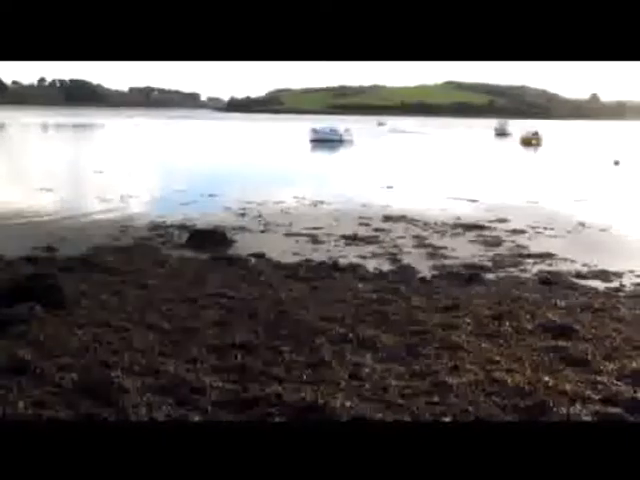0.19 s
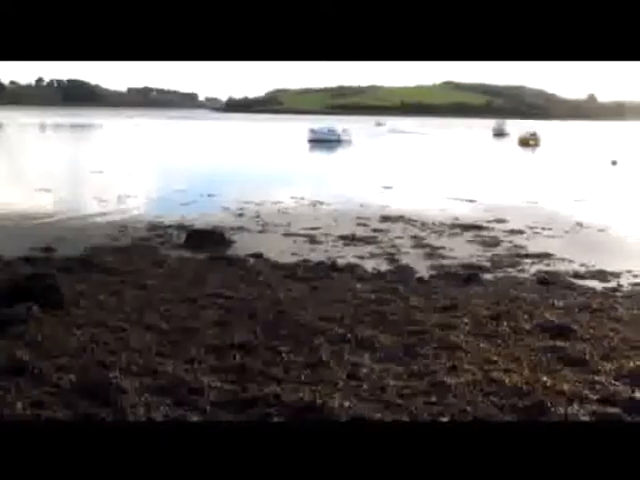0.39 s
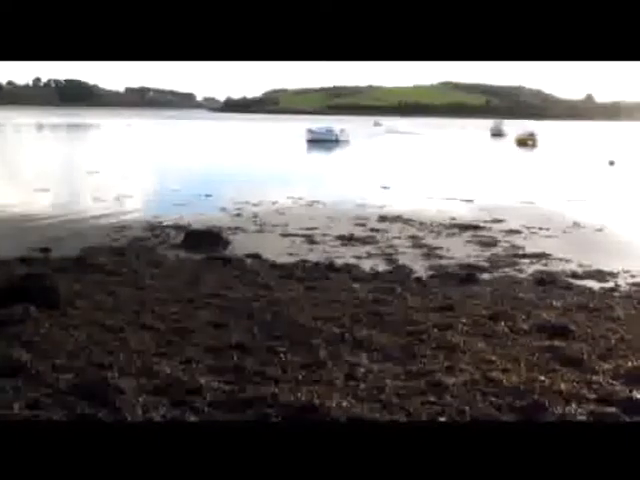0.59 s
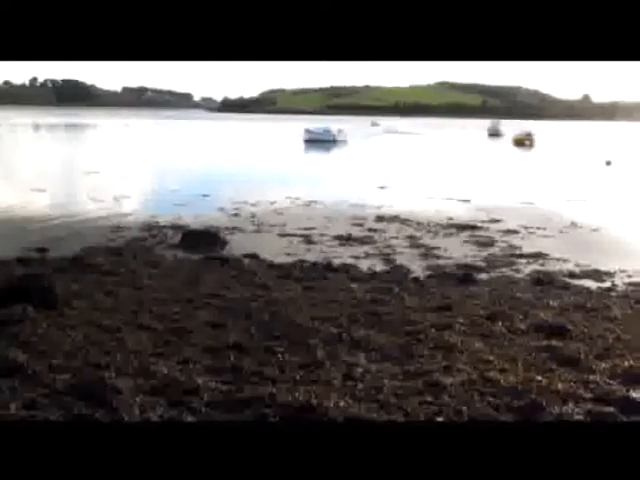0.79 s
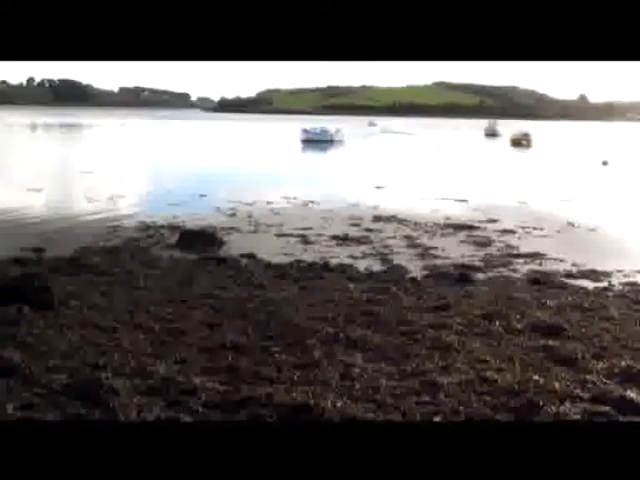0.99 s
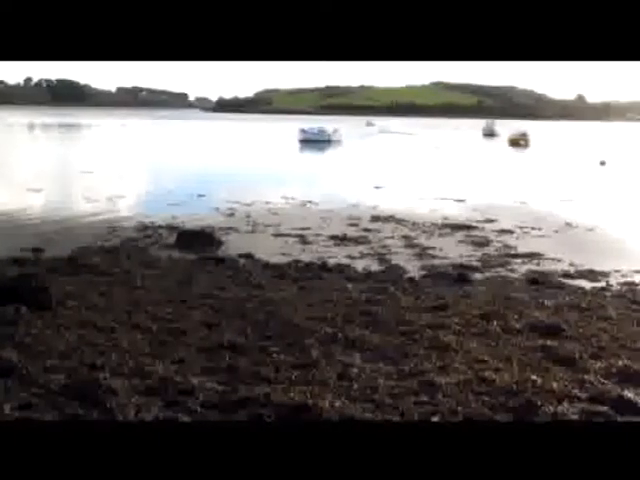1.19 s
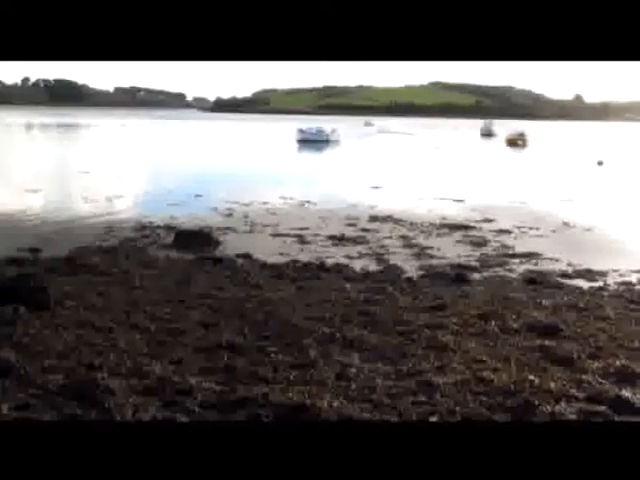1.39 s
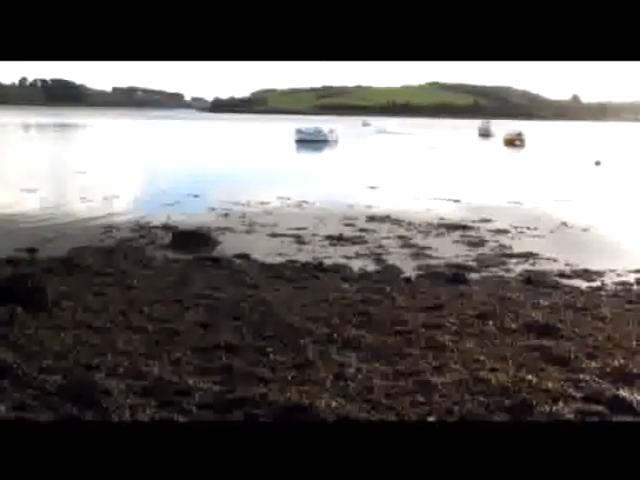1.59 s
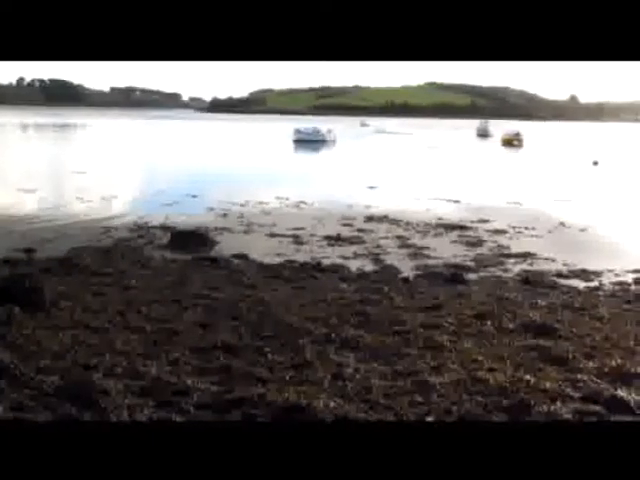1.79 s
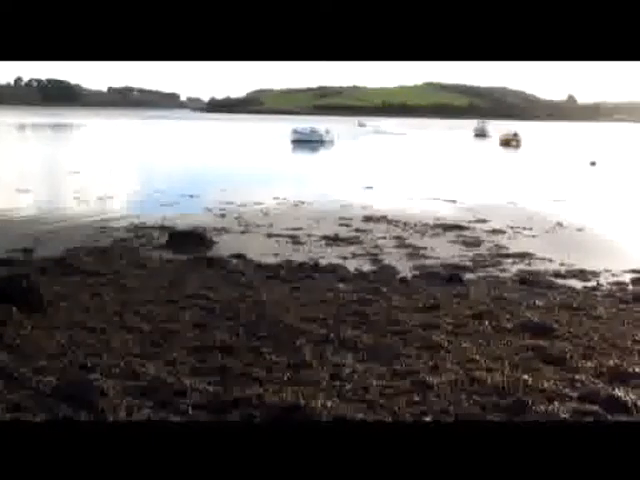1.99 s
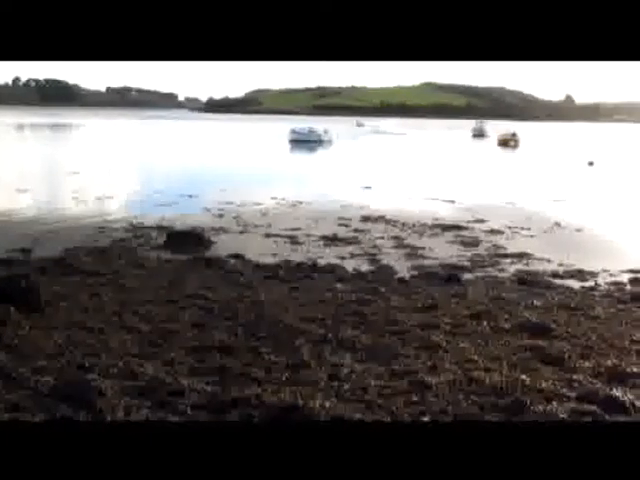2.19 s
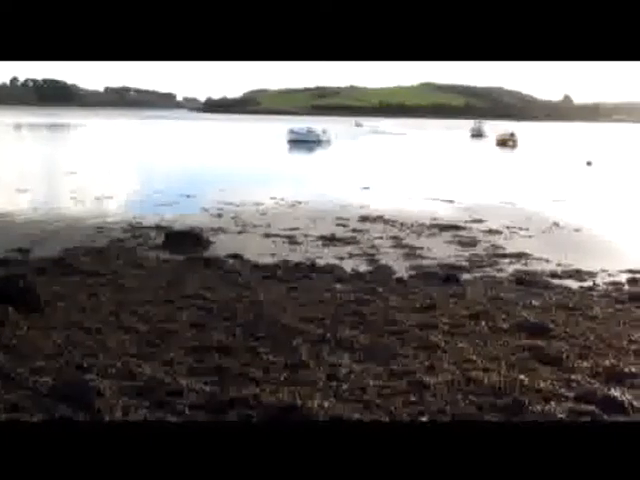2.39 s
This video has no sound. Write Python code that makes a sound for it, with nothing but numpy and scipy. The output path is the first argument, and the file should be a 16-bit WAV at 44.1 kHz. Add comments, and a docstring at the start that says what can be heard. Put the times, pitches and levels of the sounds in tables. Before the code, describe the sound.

A wading bird on an open estuary calls three times, hoarse rasps breaking into bubbling clear whistles, the third fainter; a long soft echo and faint hiss lie behind, heard through a dull, limited microphone.

```python
"""The echo of an earlier call is still fading when a wading bird on an estuary gives three bubbling calls,
near 0.2, 1.1 and 2 s, the last one fainter. Hoarse rasps (bursts of noise ringing a throat) break into clear
whistles (near sines) whose pitch swings up and down. The flats return a long soft echo (scattered noise
tails) over faint hiss and rumble; echo and hiss swell through the second call, then sink.
The recorder samples slowly, so the sound is dull and leaves a faint mirror image in the treble."""
import sys
import numpy as np
from scipy import signal
from scipy.fft import rfft, irfft, next_fast_len
from scipy.io import wavfile
from scipy.ndimage import uniform_filter1d

SR = 44100
rng = np.random.default_rng(int(sys.argv[2]) if len(sys.argv) > 2 else 0)


def file_out(sig):
    """Save sig as 16-bit WAV at sys.argv[1]."""
    # one column per channel
    cols = np.atleast_2d(sig).T
    # limit, then scale
    lim = np.clip(cols, -1, 1)
    pcm = np.round(lim * 32767).astype(np.int16)
    wavfile.write(sys.argv[1], SR, pcm)


N = 112455  # length in samples


def amp(db):
    """Turns decibels into a plain multiplier."""
    return 10 ** (np.asarray(db) / 20)


def evened(x):
    """Scales a sound to an rms of 1."""
    return x / np.sqrt(np.mean(x ** 2) + 1e-20)


def noise(size):
    """White noise, equally strong at every pitch."""
    return rng.standard_normal(size)


def drift(hz, size):
    """Slow random wander of rms about 1, mostly below hz."""
    count = next_fast_len(size + SR // 5)
    f = np.fft.rfftfreq(count, 1 / SR)
    spectrum = rfft(noise(count)) / (1 + (f / hz) ** 4)
    return evened(irfft(spectrum, count))[:size]


def shaped(x, points):
    """Colours a sound by a (Hz, dB) spectrum, silent outside it."""
    f, db = np.transpose(points)
    hz = np.fft.rfftfreq(len(x), 1 / SR)
    gain_db = np.interp(np.log(hz + 1), np.log(f + 1), db, -150, -150)
    return irfft(rfft(x) * amp(gain_db), len(x))


def lowpass(x, hz):
    """Removes everything above hz with a steep filter."""
    return signal.oaconvolve(x, signal.firwin(511, hz, window=("kaiser", 9), fs=SR), "same")


def resonate(x, hz, width):
    """Rings a sound at a pitch that may move: shift that pitch to zero, smooth twice, shift back."""
    turn = np.exp(2j * np.pi * np.cumsum(hz * np.ones(len(x))) / SR)
    r = np.exp(-np.pi * width / SR)
    smooth = signal.lfilter([(1 - r) ** 2], [1, -2 * r, r * r], x / turn)
    return 2 * (turn * smooth).real


def noise_band(hz, width):
    """Noise gathered around a moving pitch by ringing it twice, rms 1."""
    once = resonate(noise(len(hz)), hz, width)
    return evened(resonate(once, hz, width))


def span(rows):
    """Sample range, times and columns of one table."""
    s, *cols = np.transpose(rows)
    at = np.arange(round(s[0] * SR), min(round(s[-1] * SR), N))
    t = at / SR
    return at, t, [np.interp(t, s, c) for c in cols]


def played(parts):
    """Adds all the parts together, each at its own time."""
    mix = np.zeros(N)
    for at, sound in parts:
        mix[at] += sound
    return mix


def whistle(rows):
    """A near sine with a flickering octave, and bands of noise at one, two and three times its pitch."""
    # strength of the octave relative to the whistle, before its start boost and flicker: pitch_hz, level_db
    octave_levels = [(2600, -50), (3000, -32.5), (3400, -19.5), (3900, -25), (4200, -28.5)]
    # strength of the noise at three times the pitch, relative to the whistle: pitch_hz, level_db
    third_levels = [(4100, -55.5), (4400, -36.5), (4700, -29.5), (4900, -55)]
    octave_start_db, octave_start_s = 6.5, 0.072  # the octave is brightest as the whistle catches
    attack_s, release_s = 0.0021, 0.0023
    at, t, (hz, db) = span(rows)
    for _ in range(2):
        hz = uniform_filter1d(hz, size=330, mode="nearest")
    db = uniform_filter1d(db, size=260, mode="nearest")
    phase = 2 * np.pi * np.cumsum(hz) / SR

    octave_db = np.interp(2 * hz, *np.transpose(octave_levels))
    octave_db = octave_db + octave_start_db * np.exp(-(t - t[0]) / octave_start_s)
    flicker_db = 3 * drift(65, size=len(t))
    tone = np.sin(phase) + amp(octave_db + flicker_db) * np.sin(2 * phase)

    halo = amp(-41) * noise_band(hz, width=402)
    halo = halo + 0.4 * amp(octave_db) * noise_band(2 * hz, width=340)
    third_db = np.interp(3 * hz, *np.transpose(third_levels))
    halo = halo + amp(third_db) * noise_band(3 * hz, width=260)

    edge = np.clip(np.minimum((t - t[0]) / attack_s, (rows[-1][0] - t) / release_s), 0, 1)
    return at, edge * amp(db) * (np.sqrt(2) * tone + halo)


def clear_whistles():
    """All the steady whistles of the three calls, with faint low undertones."""
    # pitch paths, one list per whistle: time_s, pitch_hz, level_db
    swoops = [
        [(0.231, 1943, -17), (0.247, 1925, -18), (0.263, 1752, -24), (0.277, 1439, -21), (0.285, 1341, -25),
         (0.297, 1270, -41.5)],
        [(0.396, 1932, -20), (0.408, 2074, -12.5), (0.422, 2010, -14.5), (0.442, 1518, -33.5),
         (0.46, 1385, -26), (0.478, 1360, -47)],
        [(1.337, 1841, -29), (1.342, 1976, -15.5), (1.355, 2089, -14.5), (1.371, 2014, -15.5),
         (1.383, 1692, -22), (1.39, 1750, -40)],
        [(1.401, 1617, -31), (1.409, 1459, -25.5), (1.429, 1494, -25), (1.443, 1555, -24), (1.451, 1627, -31.5),
         (1.456, 1665, -43)],
        [(1.472, 1877, -16.5), (1.48, 2018, -18.5), (1.494, 2051, -16.5), (1.504, 2009, -16),
         (1.518, 1704, -24.5), (1.522, 1676, -34)],
        [(2.254, 1839, -33), (2.268, 2077, -29), (2.28, 2066, -30), (2.288, 2008, -29.5), (2.3, 1663, -38.5),
         (2.306, 1750, -45)],
    ]
    warbles = [
        [(0.538, 1928, -20), (0.546, 2041, -15), (0.564, 2015, -17.5), (0.586, 1501, -26), (0.61, 1506, -24.5),
         (0.634, 1645, -26), (0.658, 1938, -17.5), (0.676, 1995, -19), (0.7, 1556, -27.5), (0.732, 1580, -26),
         (0.774, 1947, -21), (0.79, 1950, -23), (0.818, 1701, -23), (0.838, 1645, -32), (0.853, 1555, -39)],
        [(1.566, 1793, -28.5), (1.574, 1720, -23), (1.59, 1955, -18), (1.604, 1988, -18), (1.614, 1861, -23.5),
         (1.63, 1681, -24.5), (1.638, 1605, -26), (1.668, 1639, -26), (1.696, 1669, -26), (1.722, 1710, -25),
         (1.732, 1617, -33), (1.738, 1587, -66)],
        [(2.319, 1563, -50), (2.329, 1457, -38), (2.345, 1468, -36.5), (2.363, 1565, -37), (2.375, 1615, -39.5),
         (2.405, 2006, -32), (2.423, 2053, -32.5), (2.431, 2005, -34), (2.449, 1593, -40.5),
         (2.461, 1524, -38.5), (2.483, 1540, -43), (2.517, 1962, -39), (2.533, 1974, -40), (2.56, 1805, -39.5)],
    ]
    chips = [
        [(1.16, 2048, -21), (1.168, 1978, -15), (1.184, 1764, -25), (1.192, 1775, -24.5)],
        [(1.188, 2057, -37.5), (1.196, 2198, -21.5), (1.21, 1866, -37.5)],
        [(1.389, 2020, -22.5), (1.397, 1928, -26.5), (1.415, 2016, -50.5)],
        [(1.523, 2007, -26.5), (1.539, 1996, -31.5), (1.563, 2052, -26.5), (1.572, 1740, -27)],
        [(2.042, 1884, -25), (2.052, 1997, -25.5), (2.068, 1745, -28), (2.076, 1954, -48)],
        [(2.073, 2107, -28.5), (2.083, 2080, -35.5), (2.092, 1987, -48)],
        [(2.304, 2147, -46), (2.31, 2090, -42.5), (2.32, 1930, -43.5)],
    ]
    low_chips = [
        [(1.208, 1407, -33), (1.222, 1359, -25), (1.242, 1410, -35)],
        [(1.516, 1680, -30.5), (1.524, 1658, -31), (1.533, 1598, -46.5)],
        [(2.096, 1397, -42.5), (2.104, 1323, -41.5), (2.116, 1330, -43), (2.136, 1400, -55.5)],
    ]
    undertones = [
        [(1.5, 1008, -73), (1.552, 991, -47), (1.604, 1033, -68)],
        [(2.08, 916, -73), (2.164, 1022, -51.5), (2.202, 1095, -63.5)],
    ]
    return played(whistle(r) for r in swoops + warbles + chips + low_chips + undertones)


def stutter(rows):
    """The whistle catches and drops out many times a second, ever faster."""
    at, sound = whistle(rows)
    per_s = np.linspace(75, 140, len(at)) * (1 + 0.14 * drift(50, size=len(at)))
    turns = np.cumsum(per_s) / SR
    return at, sound * evened(abs(np.sin(np.pi * turns)) ** 1.5)


def stuttering_whistles():
    """The broken whistles heard inside the rasp."""
    # pitch paths, one list per stutter: time_s, pitch_hz, level_db (average over the stutter)
    stutter_paths = [
        [(0.2, 1438, -49.5), (0.218, 1709, -31.5), (0.23, 1644, -21.5)],
        [(0.48, 1470, -32.5), (0.53, 1722, -45), (0.537, 1786, -62.5)],
        [(1.125, 1459, -44.5), (1.139, 1320, -34.5), (1.16, 1722, -41)],
        [(1.25, 1430, -38.5), (1.266, 1446, -39), (1.336, 1898, -35)],
        [(2.008, 1456, -53.5), (2.016, 1355, -46.5), (2.04, 1833, -28)],
        [(2.165, 1584, -48), (2.177, 1440, -42.5), (2.253, 1743, -46)],
    ]
    return played(stutter(r) for r in stutter_paths)


def breath(clear):
    """A band of airy noise around the octave that follows the whistle and lingers."""
    linger_s, band_hz = 0.0086, (3141, 3964)
    r = np.exp(-1 / (linger_s * SR))
    level = np.sqrt(signal.lfilter([1 - r], [1, -r], clear ** 2))
    band = signal.butter(10, band_hz, "bandpass", fs=SR, output="sos")
    air = evened(signal.sosfilt(band, noise(N)))
    return amp(-32 + 4.0 * drift(25, size=N)) * level * air


def rasp(rows):
    """Uneven bursts of turbulent air ring the throat, each ring flickering on its own."""
    # rings of the throat at middling effort: pitch_hz, width_hz (of one smoothing), relative level_db
    throat_rings = [(888, 74, -9), (1125, 130, 1), (1483, 240, 8.5), (1863, 250, 5), (2154, 300, 9.5),
                    (2697, 270, -0.5), (3191, 380, 3), (3694, 320, -2), (4010, 41, -24)]
    lower_hz, upper_hz = 980, 2500  # between these a ring blends the lower and upper level
    at, t, (upper_db, lower_db) = span(rows)
    per_s = 120 * (1 + 0.38 * drift(60, size=len(t)))
    turns = np.cumsum(per_s) / SR
    depth = 0.55
    bursts = evened(1 - depth + depth * abs(np.sin(np.pi * turns)) ** 0.78)

    air, out = noise(len(t)), 0
    # the rings climb with effort: a share of their pitch per dB
    climb = 1 + 0.0035 * np.clip(upper_db + 44, -12, 12)
    for ring_hz, width_hz, ring_db in throat_rings:
        high = np.clip((ring_hz - lower_hz) / (upper_hz - lower_hz), 0, 1)
        effort_db = high * upper_db + (1 - high) * lower_db
        flicker_db = 3.5 * drift(29.4, size=len(t))
        db = -2 + ring_db + effort_db + flicker_db
        out = out + amp(db) * evened(resonate(air, ring_hz * climb, width_hz))

    no_bass = signal.butter(6, 733, "highpass", fs=SR, output="sos")
    out = signal.sosfilt(no_bass, bursts * out)
    edge = np.clip(np.minimum(t - t[0], t[-1] - t) / 0.044, 0, 1)  # 44 ms fades
    return at, edge * out


def hoarse_rasps(clear):
    """The rasp of each call, choked wherever a clear whistle stands out above its surroundings."""
    # effort, one list per call: time_s, upper rings level_db, lower rings level_db (both relative)
    rasp_paths = [
        [(0.17, -67, -74), (0.2, -57, -43.5), (0.216, -40, -44.5), (0.248, -53, -49.5), (0.284, -54, -45),
         (0.342, -49, -42.5), (0.396, -39, -44.5), (0.45, -53.5, -48), (0.47, -52, -61.5), (0.486, -53.5, -46),
         (0.536, -28, -48), (0.56, -41.5, -60), (0.63, -50.5, -66.5)],
        [(1.09, -72.5, -61.5), (1.14, -36.5, -39.5), (1.16, -29, -45), (1.188, -47, -56.5), (1.208, -50.5, -45),
         (1.292, -46.5, -43.5), (1.338, -32.5, -49), (1.372, -61, -68), (1.402, -52.5, -50),
         (1.428, -59.5, -70.5), (1.45, -39, -50), (1.474, -37.5, -45.5), (1.496, -57.5, -65.5),
         (1.56, -94.5, -49)],
        [(1.98, -82, -73.5), (2.0, -60, -50.5), (2.016, -53.5, -48.5), (2.034, -43.5, -52), (2.044, -42.5, -53),
         (2.058, -65, -68), (2.094, -60, -61), (2.106, -60, -65.5), (2.136, -69, -58), (2.16, -62, -58),
         (2.258, -46, -68), (2.268, -57.5, -72.5), (2.31, -69.5, -65), (2.36, -69.5, -87)],
    ]
    choke_db = 2.5  # a whistle this far above the mean around it halves the rasp
    now = abs(uniform_filter1d(clear ** 2, size=90))
    around = abs(uniform_filter1d(clear ** 2, size=13000)) + 1e-9
    loud = now / around / amp(choke_db) ** 2
    return played(rasp(r) for r in rasp_paths) / (1 + loud)


def flats(x):
    """Near and far scattered echoes, changing slowly as the bird moves; gives the last N samples."""
    # the near and far echo before colouring: relative level_db, time to fall 60 dB in seconds
    echo_tails = [(-20, 0.31), (-32.5, 3.6)]
    # colour of the echo: pitch_hz, relative level_db
    echo_tint = [(60, 0), (2150, -0.2), (2300, -20), (2900, -17.5), (3100, -4.5), (4100, -2), (4300, -20.5),
                 (5200, -20.5)]
    t, out = np.arange(2 * SR) / SR, np.zeros(N)
    for turn in range(3):  # three echo patterns take turns
        tail = sum(amp(db) * evened(amp(-60 * t / t60) * noise(len(t))) for db, t60 in echo_tails)
        tail = tail * (t > .008) / np.sqrt(len(t))  # no echo in the first 8 ms
        window = np.sqrt(2 / 3) * np.cos(np.pi * (2.26 * np.arange(len(x)) / SR + turn / 3))
        out += signal.fftconvolve(x * window, tail)[len(x) - N:len(x)]
    return shaped(out, echo_tint)


def echoes(bird):
    """The echo of the calls, and of an earlier call that still rings at the start."""
    before = amp(4) * bird[round(.17 * SR):round(.87 * SR)]  # the first call again, 4 dB louder
    gap = np.zeros(round(0.04 * SR))
    return flats(np.concatenate([before, gap, bird]))


def floor(fade):
    """Faint noise coloured as hiss, and a low rumble of slow wander that comes in lumps."""
    # colour of the hiss: pitch_hz, relative level_db
    hiss_tint = [(130, -25), (180, -2), (400, -8), (900, -1), (1400, -2), (2150, 1.5), (2350, -15),
                 (2900, -12), (3200, -1), (4300, -20), (4900, -27)]
    hiss = amp(-68.5 + 1.0 * drift(4.9, size=N)) * evened(shaped(noise(N), hiss_tint))
    rumble = amp(-73.5 + 6.5 * drift(17.0, size=N)) * drift(31, size=N)
    return fade * hiss + rumble


def scene():
    """The bird's whistles, breath and rasps, then the echo and the background."""
    # slow swell and fall of echo and hiss: time_s, change_db
    background_fade = [(0, 2.5), (.9, 5.5), (1.5, 5.5), (1.9, -2), (2.55, -2.5)]
    clear = clear_whistles()
    bird = clear + breath(clear) + stuttering_whistles() + hoarse_rasps(clear)
    fade = amp(np.interp(np.arange(N) / SR, *np.transpose(background_fade)))
    return (bird + fade * echoes(bird) + floor(fade))[None]


def record(dry):
    """Slow sampling: a dull band and its faint mirror; then the band limit and a small steady offset."""
    # colour of the mirror image: pitch_hz, level_db
    mirror_tint = [(5600, -28.5), (6500, -10), (7200, -29), (9000, -62), (9900, -59.5)]
    slow_rate_hz = 11025
    dull = lowpass(dry[0], 4850)
    # multiplying by a tone at the slow rate flips the band to just above itself
    flipped = 2 * dull * np.cos(2 * np.pi * slow_rate_hz * np.arange(N) / SR)
    mirror = shaped(flipped, mirror_tint)
    return lowpass(dull + mirror, 10000)[None] + 0.0015


dry = scene()
out = record(dry)
file_out(out)
```